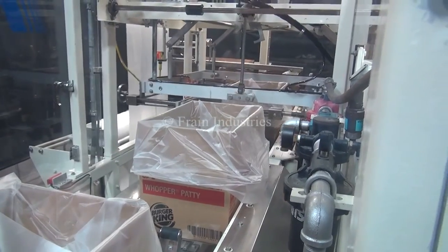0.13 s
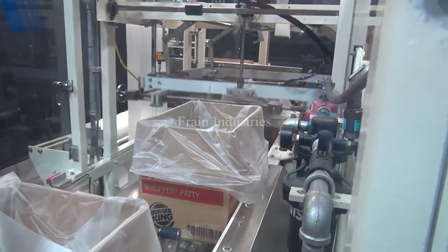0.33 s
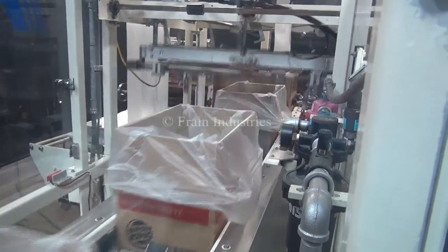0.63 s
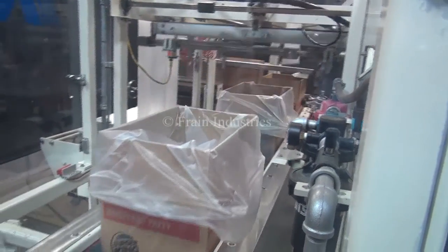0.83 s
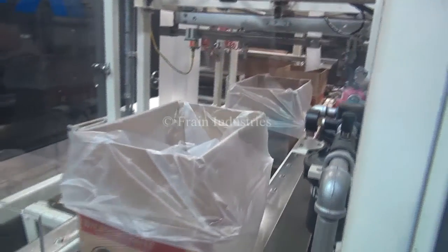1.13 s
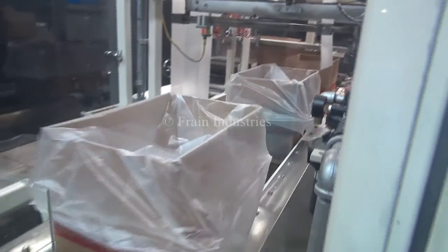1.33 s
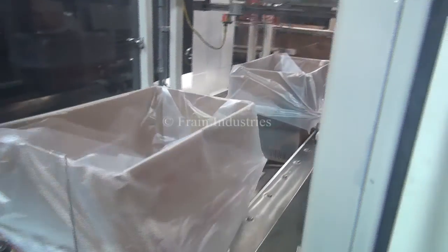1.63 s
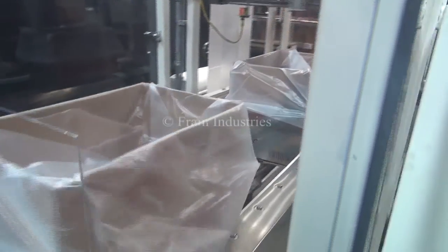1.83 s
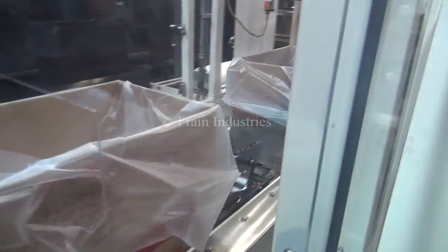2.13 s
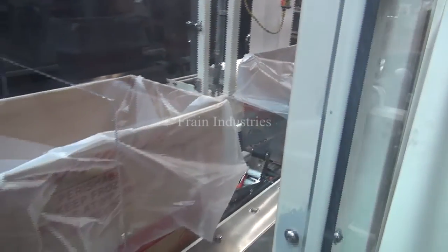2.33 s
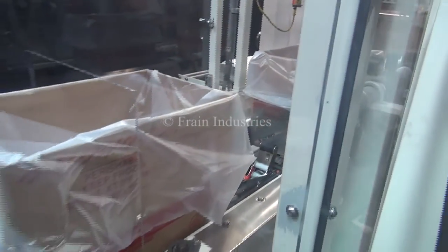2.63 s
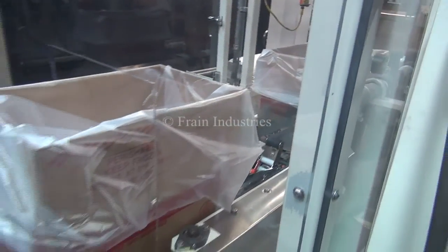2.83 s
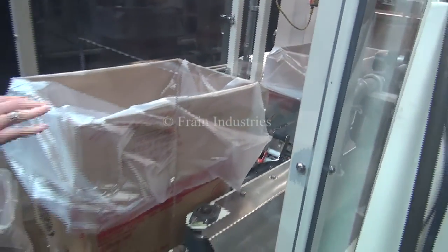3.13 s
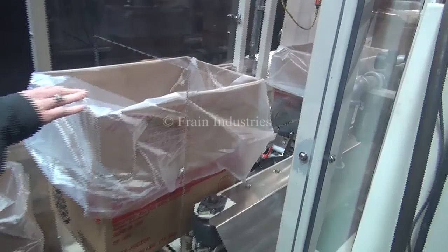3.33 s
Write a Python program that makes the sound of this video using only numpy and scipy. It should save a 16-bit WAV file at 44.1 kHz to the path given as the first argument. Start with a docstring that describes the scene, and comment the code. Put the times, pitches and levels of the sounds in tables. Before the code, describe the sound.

A packaging machine hums, rumbles and hisses in a factory hall. Air puffs at 0, 0.2 and 0.4 seconds; hollow carton knocks, rattle and a scrape cluster around 0.5. Loud microphone pops with brief mutes and crackles strike at 0.8, 1.3 to 1.5 and 2.04. Cartons thump near 2.0 and 2.2; the quieter machine then clicks at 2.4, a near valve spits at 2.7, and faint scrapes and a bump follow around 2.9.

```python
"""Carton-lining machine in a factory hall

Motors hum under the roar of the hall, the conveyor rumbles and air hisses: wavering tones and shaped noise.
Puffs of noise are the air exhausts and one near valve; decaying modes are the cartons and loose parts.
Cardboard and plastic liners scrape in grainy bands of noise.
Several times the microphone pops loudly, mutes for about a tenth of a second and sputters back.
"""
import sys
import numpy as np
from scipy import signal
from scipy.fft import rfft, irfft
from scipy.io import wavfile

SR = 44100
rng = np.random.default_rng(int(sys.argv[2]) if len(sys.argv) > 2 else 0)


def output_pcm(signal):
    """Save a mono or channel-first signal as 16-bit PCM at the path in sys.argv[1].

    Samples are clipped to [-1, 1] before scaling.
    """
    pcm = np.clip(np.atleast_2d(signal).T, -1, 1) * 32767
    wavfile.write(sys.argv[1], SR, np.round(pcm).astype(np.int16))


N = 153027

# Machine noise over time: (time [s], bass level [dB], middle level [dB], treble level [dB])
MACHINE_LEVELS = [(0, -36.5, -28, -28), (.33, -33.5, -30.5, -31), (.55, -33.5, -26.5, -29.5),
                  (.68, -25, -29, -32), (.79, -35, -28, -32), (1.0, -25.5, -30, -31.5),
                  (1.17, -38, -33, -34.5), (1.28, -41, -31.5, -34.5), (1.62, -28.5, -24.5, -30.5),
                  (1.77, -32, -28, -26.5), (1.9, -27, -30, -30), (2.03, -29, -28.5, -27.5),
                  (2.201, -36, -36, -36), (2.58, -37, -36.5, -35.5), (2.85, -42, -37, -38.5),
                  (3.05, -38.5, -37.5, -43), (3.3, -43.5, -37, -41), (3.46, -34.5, -36, -36)]
# Relative spectra of rumble, roar and hiss: (frequency [Hz], density [dB per Hz])
RUMBLE_SPECTRUM = [(15, -13), (70, -5), (120, -0.5), (160, -4.5), (500, -48.5)]
ROAR_SPECTRUM = [(90, -25), (170, -1), (260, 3.5), (520, -2), (1400, -13), (3000, -42)]
HISS_SPECTRUM = [(500, -14.5), (1100, 1), (1700, 1.75), (3600, -1.27), (6300, -5.5), (12500, -15.5),
                 (14500, -24)]
# Ringing of the steel frame: (frequency [Hz], width [Hz], boost [dB])
FRAME_RINGS = [(502.4, 14, 7.5), (600, 6.3, 9.5), (747, 25, 3.5), (2320, 73, 1), (8250, 260, 2.5)]
# Motor tones before the common level: (frequency [Hz], rms level [dB], waver [dB], pitch wander [share])
MOTOR_TONES = [(118.4, -35, 7.5, 0.033), (355.7, -34.5, 1, 0.0014), (492, -47, 12, 0.0062)]
# Common level added to the motor tones: (time [s], level [dB])
MOTOR_LEVELS = [(.3, 4), (1.15, -4.5), (1.9, 0), (2.4, -3)]
# Air exhausts: (time [s], level [dB], attack [s], hold [s], decay [s], tilt [dB per octave])
EXHAUSTS = [(-.01, -22, 0.016, 0.023, 0.06, -5), (0.165, -20, 0.032, 0.025, 0.034, -3),
            (0.398, -24.5, 0.021, 0.021, 0.032, 2), (0.715, -33, 0.014, 0.057, 0.045, 2),
            (1.408, -19.5, 0.016, 0.024, .03, -3.5)]
# Relative spectra of the exhausts and of the near valve: (frequency [Hz], density [dB per Hz])
EXHAUST_SPECTRUM = [(300, -8), (900, -7.5), (1600, -0.5), (2400, 3), (4800, -1), (14000, -13.5)]
VALVE_SPECTRUM = [(1100, -10.5), (2300, -3), (3400, -4.5), (6400, -10), (7500, -25), (11000, -28.5)]
# Resonances of the valve's silencer: (frequency [Hz], width [Hz], boost [dB])
SILENCER_RINGS = [(2520, 110, 6.5), (3270, 320, 11), (3890, 110, 7), (5800, 650, 11), (8800, 1400, 16)]
# Carton bumps: (time [s], level [dB], pitch [Hz], decay [s])
BUMPS = [(0.064, -22.5, 111, 0.07), (0.484, -14.5, 202, 0.027), (.532, -22, 253, 0.055),
         (.556, -22, 270, 0.024), (0.624, -21.5, 277, 0.017), (1.977, -9, 112, 0.012),
         (2.013, -15.5, 101.5, 0.0215), (2.171, -19.5, 182, 0.028), (2.174, -23.5, 332, 0.018),
         (2.198, -19.5, 216, 0.019), (2.946, -23, 220, 0.019)]
# Modes of a hollow carton: (multiple of the pitch [ratio], level [dB], share of the decay [ratio])
CARTON_MODES = [(1, 3.5, 0.68), (1.36, -4.5, 0.88), (1.85, -4, 0.33)]
# Relative spectrum of a carton scuffing the belt: (frequency [Hz], density [dB per Hz])
SCUFF_SPECTRUM = [(60, -3.5), (200, 11), (500, -4.5), (4000, -37)]
# Modes of lift, carton stop and guide rails: (frequency [Hz], width [Hz], relative level [dB])
LIFT_MODES = [(370, 110, -1), (640, 70, -3), (723, 50, -0.5)]
STOP_MODES = [(297, 110, 0), (560, 86, 2.5), (736, 70, -0.5), (2450, 71, 3), (2700, 140, -8)]
GUIDE_MODES = [(1180, 62, 3), (1440, 88, 1), (1760, 300, 2.5), (2470, 45, -9)]
# Their rattles: (time [s], level of the blows [dB], hold [s])
LIFT_RATTLES = [(.412, -25.5, .012), (.492, -27.5, 0.0066), (.535, -30.5, 0.036)]
STOP_RATTLES = [(2.408, -31, .008), (2.434, -30.5, .016)]
GUIDE_RATTLES = [(.732, -31.5, 0.031), (.962, -35, 0.015), (1.008, -40, .003)]
# Scrapes of cartons and liners: (time [s], level [dB], decay [s], centre [Hz]); the hold is half the decay
SCRAPES = [(0.496, -34, 0.11, 1700), (2.855, -36.5, 0.0072, 6700), (2.933, -36.5, 0.023, 3600)]
# Relative spectrum of the faint side noise: (frequency [Hz], density [dB per Hz])
SIDE_SPECTRUM = [(25, 17), (150, -6), (14000, 6.5)]
# Microphone cut-outs: (time [s], bias jump before filters and gain [], dead time [s], leak at first [share])
CUTOUTS = [(0.804, 0.75, 0.127, 0.36), (1.288, -0.96, 0.12, 0.033), (1.431, 0.82, .1, 0.0096),
           (1.5032, -0.84, .09, 0.15), (2.0423, 0.89, 0.12, 0.58)]
# Sharp crackles of the microphone: (time [s], height [full scale], length [s])
CRACKLES = [(0.965, 0.19, .0001), (0.975, 0.26, 0.00021), (0.981, 0.26, 0.000073), (1.512, 0.89, 0.000057),
            (1.5125, 0.94, 0.00033)]
# Coupling filters of the microphone: (corner [Hz], corner [Hz])
COUPLING_CORNERS = (31.5, 10)

FLICKER_DB, FLICKER_HZ = 2, 11  # depth and rate of the swells
VALVE_START_S, VALVE_DB = 2.724, -22
VALVE_ATTACK_S, VALVE_HOLD_S, VALVE_DECAY_S = 0.0068, 0.019, 0.064
VALVE_TREBLE_SHARE = 0.54  # treble decay as a share of the body's
BUMP_ATTACK_S, SCUFF_DB = 0.0018, -6.5
RATTLE_ATTACK_S, RATTLE_DECAY_S = 0.0056, 0.032
RATTLE_GAP_S, RATTLE_SCATTER_DB = 0.0033, 4  # mean gap, scale of the spread in blow size
SCRAPE_OCTAVES, SCRAPE_GRAIN = 0.67, 0.68  # half-width at -6 dB, depth of grain (log gain)
SIDE_DB = -63.5
LEAK_S, RECOVER_S = 0.022, 0.0086  # time for the leak to fade, for the sound to return
SWING_HZ, SWING_DAMPING, POP_DB = 15, 0.61, 0.5
RAIL = 0.88  # clipping level [full scale]
STOP_HZ = 14600  # edge of the stop band


def undb(db):
    """Decibels to gain."""
    return 10 ** (np.asarray(db) / 20)


def unit(x):
    """Scale to rms 1."""
    return x / np.sqrt(np.mean(x ** 2))


def clock():
    """Time of each sample in seconds."""
    return np.arange(N) / SR


def freqs():
    """Frequency of each spectral bin in Hz, at least 1."""
    return np.maximum(np.arange(N // 2 + 1) * SR / N, 1)


def shape(points):
    """Spectrum in dB through (Hz, dB) points, falling 12 dB per octave beyond the ends."""
    hz, db = np.array(points, float).T
    octave = np.log2(freqs())
    outside = np.abs(octave - np.clip(octave, np.log2(hz[0]), np.log2(hz[-1])))
    return np.interp(octave, np.log2(hz), db) - 12 * outside


def ringing(peaks):
    """Boost in dB that resonances give to noise passing through them."""
    return sum(db / (1 + (2 * (freqs() - hz) / width) ** 2) for hz, width, db in peaks)


def noise(spectrum):
    """Noise of rms 1 with a spectrum in dB."""
    return unit(irfft(rfft(rng.standard_normal(N)) * undb(spectrum), N))


def walk(rate):
    """Smooth random wander of rms 1, slower than about the rate in Hz."""
    return noise(-20 * np.log10(1 + (freqs() / rate) ** 4))


def envelope(start, attack, hold, decay):
    """Straight rise, hold and exponential fall."""
    age = clock() - start
    rise = np.clip(age / attack, 0, 1)
    return rise * np.exp(-np.maximum(age - attack - hold, 0) / decay)


def flicker(x, count=9):
    """Half-octave bands from 400 Hz up swell and sink on their own, as loose parts chatter."""
    spectrum = rfft(x)
    place = 2 * np.log2(freqs() / 400)  # in half octaves
    for k in range(count):
        band = irfft(spectrum * np.clip(1 - np.abs(place - k), 0, 1), N)
        swell = unit(undb(FLICKER_DB * walk(FLICKER_HZ)))
        x = x + band * (swell - 1)
    return x


def machine_layer(spectrum, levels, flutter_db):
    """Noise that rings the steel frame, following its level curve with a quick flutter."""
    times = np.array(MACHINE_LEVELS)[:, 0]
    level = np.interp(clock(), times, levels) + flutter_db * walk(35)
    return noise(shape(spectrum) + ringing(FRAME_RINGS)) * undb(level)


def machinery():
    """Conveyor rumble, roar of the drives and hiss of air and sliding plastic, as fluttering noise."""
    _, bass, middle, treble = np.array(MACHINE_LEVELS).T
    rumble = machine_layer(RUMBLE_SPECTRUM, bass, flutter_db=0.5)
    roar = machine_layer(ROAR_SPECTRUM, middle, flutter_db=1.66)
    hiss = machine_layer(HISS_SPECTRUM, treble, flutter_db=0.52)
    return flicker(rumble + roar + hiss)


def motors():
    """Motor tones, each wavering in level and wandering in pitch."""
    out = 0
    for hz, db, waver_db, wander in MOTOR_TONES:
        phase = 2 * np.pi * np.cumsum(hz * (1 + wander * walk(8.1))) / SR
        tone = np.sin(phase) * undb(waver_db * walk(5.5))
        out = out + unit(tone) * undb(db)
    return out * undb(np.interp(clock(), *np.array(MOTOR_LEVELS).T))


def air_exhausts():
    """Cylinders vent in short puffs of noise that ring the frame."""
    spectrum = shape(EXHAUST_SPECTRUM) + ringing(FRAME_RINGS)
    octave = np.log2(freqs())
    out = 0
    for start, db, attack, hold, decay, tilt in EXHAUSTS:
        puff = envelope(start, attack, hold, decay)
        out = out + undb(db) * puff * noise(spectrum + tilt * octave)
    return out


def scrapes():
    """Short grainy scrapes: dull from cardboard, bright from plastic film."""
    out = 0
    for start, db, decay, hz in SCRAPES:
        distance = np.log2(freqs() / hz) / SCRAPE_OCTAVES
        band = noise(-20 * np.log10(1 + distance ** 2))
        grain = np.exp(SCRAPE_GRAIN * np.tanh(walk(400)))
        out = out + undb(db) * envelope(start, 0.012, decay / 2, decay) * unit(band * grain)
    return out


def rattle(events, modes, count=2400):
    """A loose part chatters: a quick, uneven run of small blows rings its modes."""
    times = np.cumsum(RATTLE_GAP_S * 2 * rng.random(count))
    sizes = undb(RATTLE_SCATTER_DB * rng.uniform(-1.4, 1.7, count))
    sizes = sizes * rng.choice([-1, 1], count)
    blows = np.bincount((times * SR).astype(int), sizes, N)[:N]
    body = 0
    for hz, width, db in modes:
        body = body + undb(db) / (1 + 1j * (freqs() - hz * hz / freqs()) / width)
    force = 0
    for start, db, hold in events:
        force = force + undb(db) * envelope(start, RATTLE_ATTACK_S, hold, RATTLE_DECAY_S)
    rung = irfft(rfft(unit(blows) * force) * body, N)
    return rung / np.sqrt(np.mean(np.abs(body) ** 2))


def rattles():
    """The lift clunks, the guide rails chatter and the carton stop knocks, each by its own modes."""
    lift = rattle(LIFT_RATTLES, LIFT_MODES)
    guides = rattle(GUIDE_RATTLES, GUIDE_MODES)
    stop = rattle(STOP_RATTLES, STOP_MODES)
    return lift + guides + stop


def near_valve(split_hz=4500):
    """A valve near the microphone spits once: a sharp, hollow hiss whose treble dies first."""
    hiss = noise(shape(VALVE_SPECTRUM) + ringing(SILENCER_RINGS)) * undb(0.66 * walk(250))
    body = irfft(rfft(hiss) / (1 + (freqs() / split_hz) ** 8), N)
    treble = hiss - body
    treble_decay = VALVE_DECAY_S * VALVE_TREBLE_SHARE
    body_puff = envelope(VALVE_START_S, VALVE_ATTACK_S, VALVE_HOLD_S, VALVE_DECAY_S)
    treble_puff = envelope(VALVE_START_S, VALVE_ATTACK_S, VALVE_HOLD_S, treble_decay)
    return undb(VALVE_DB) * (body * body_puff + treble * treble_puff)


def cartons():
    """Each bump rings the modes of the hollow carton and scuffs it on the belt."""
    out = np.zeros(N)
    for start, db, pitch, decay in BUMPS:
        age = np.maximum(clock() - start, 0)
        ring = 0
        for ratio, mode_db, share in CARTON_MODES:
            tone = np.sin(2 * np.pi * (pitch * ratio * age + rng.random()))
            ring = ring + undb(mode_db) * tone * np.exp(-age / (decay * share))
        scuff = undb(SCUFF_DB) * noise(shape(SCUFF_SPECTRUM)) * np.exp(-age / decay)
        out += undb(db) * np.minimum(age / BUMP_ATTACK_S, 1) * (ring + scuff)
    return out


def scene():
    """The machine is almost in mono, with a very faint steady noise of opposite sign left and right."""
    background = machinery() + motors() + air_exhausts()
    mid = background + near_valve() + cartons() + rattles() + scrapes()
    side = undb(SIDE_DB) * noise(shape(SIDE_SPECTRUM))
    return mid + side * np.array([[1], [-1]])


def bias_pop(bias):
    """Jumps of the bias swing out through a damped resonance and the coupling filters."""
    w = 2 * np.pi * SWING_HZ
    swing = signal.bilinear([1, 0, 0], [1, SWING_DAMPING * w, w * w], SR)
    pop = signal.lfilter(*swing, bias)
    for hz in COUPLING_CORNERS:
        pop = signal.lfilter(*signal.butter(1, hz, "high", fs=SR), pop)
    return undb(POP_DB) * pop


def cut_out(x):
    """The microphone's bias jumps and mutes it with a pop; sound leaks briefly, then sputters back."""
    t = clock()
    bias, live, crackle = np.zeros(N), np.ones(N), np.zeros(N)
    sputter = np.exp(0.5 * walk(900))  # random bend of the return
    for start, height, dead, leak in CUTOUTS:
        age = t - start
        bias += height * (age >= 0)
        back = np.clip((age - dead) / RECOVER_S, 0, 1)
        fading = leak * np.clip(1 - (age / LEAK_S) ** 2, 0, 1)
        live = np.where(age >= 0, fading + back ** sputter, live)
    for start, height, length in CRACKLES:
        rise = np.clip((t - start) * SR, 0, 1)
        fall = np.clip((start + length - t) * SR, 0, 1)
        crackle += height * rise * fall
    return x * live + bias_pop(bias) + crackle


def record(dry):
    """Microphone cut-outs, clipping at the rail and a steep top cut."""
    clipped = np.clip(cut_out(dry), -RAIL, RAIL)
    top_cut = signal.cheby2(12, 45, STOP_HZ, fs=SR, output="sos")
    return signal.sosfiltfilt(top_cut, clipped)


dry = scene()
out = record(dry)
output_pcm(out)
```